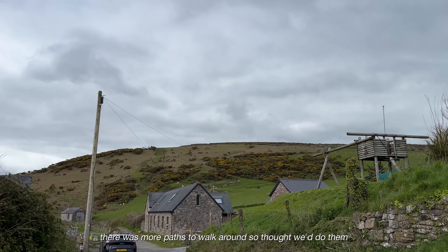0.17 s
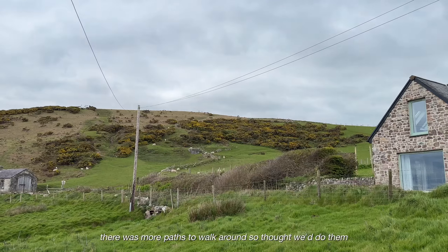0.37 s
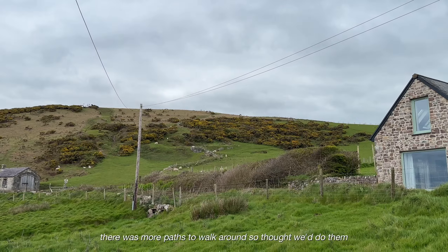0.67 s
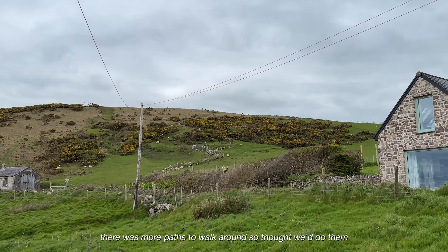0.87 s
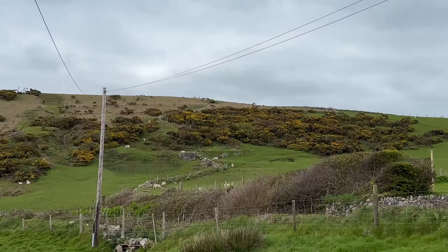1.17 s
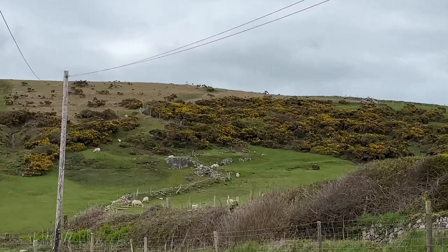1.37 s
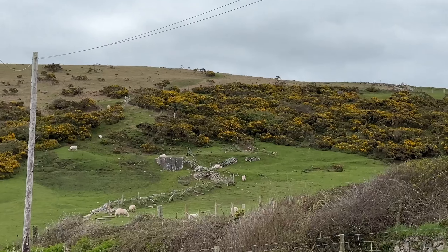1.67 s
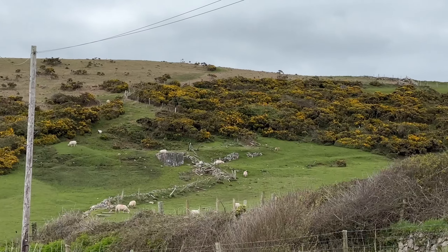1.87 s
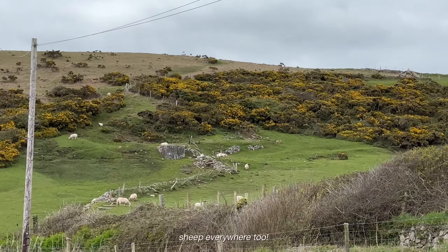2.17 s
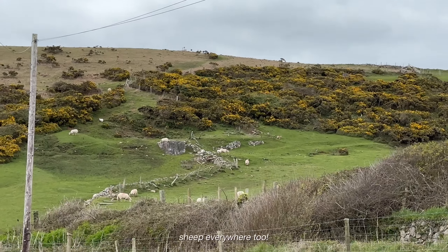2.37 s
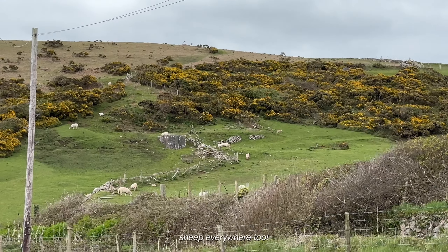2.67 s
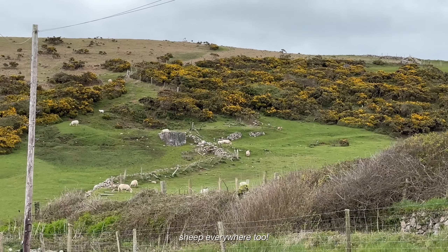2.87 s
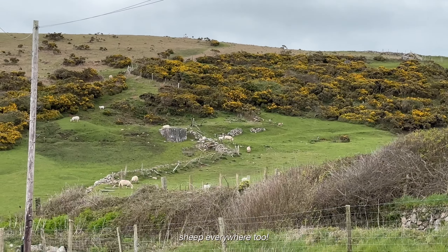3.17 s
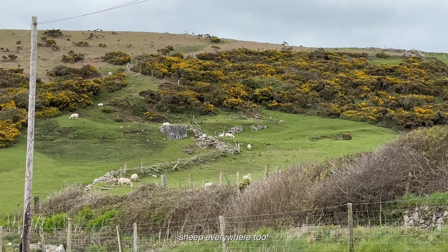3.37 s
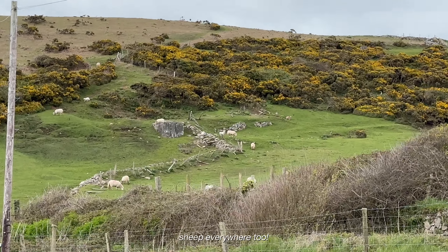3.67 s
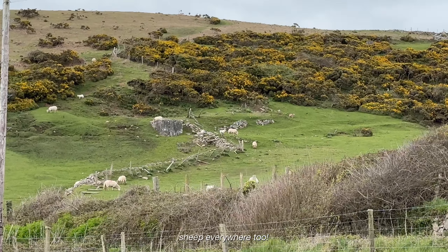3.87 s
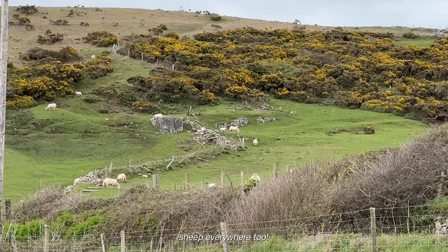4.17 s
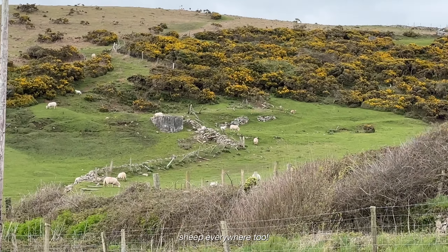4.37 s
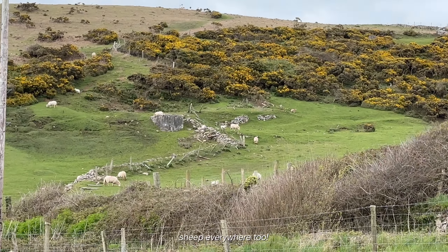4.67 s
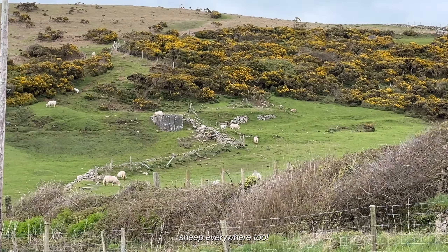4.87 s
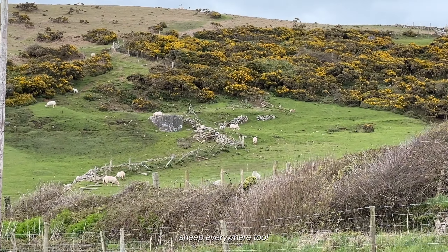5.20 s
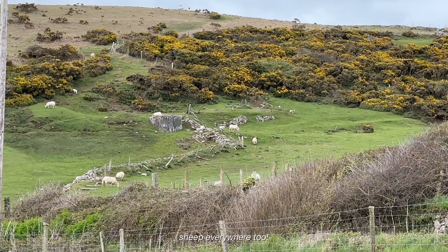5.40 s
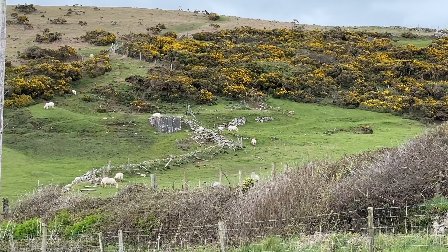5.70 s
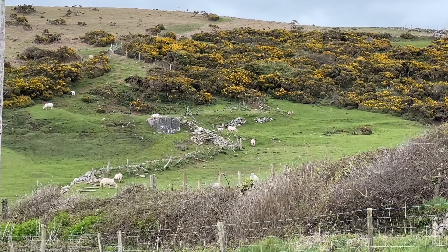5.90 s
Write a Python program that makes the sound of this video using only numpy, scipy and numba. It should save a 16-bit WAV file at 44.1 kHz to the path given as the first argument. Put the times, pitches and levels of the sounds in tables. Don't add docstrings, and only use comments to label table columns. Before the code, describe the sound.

At 0.1-0.3 s a foot drags over gritty ground with small ticks under soft hiss; at about 0.32 s a tiny gap marks a cut to an open hillside. Wind immediately buffets the stereo microphone: low rumble, muffled thumps and fluttering bursts, strongest around 0.5, 1.0-1.3 and 1.8 s, the last with sharp cracks. The hiss fades away. From 0.95 to 1.9 s a distant ewe bleats, hoarse and trembling, partly buried. A faint bird trill runs at 1.9-2.4 s, then bright gliding whistles and warbles until 4.2 s, with a lower piping bird at 2-3 s. Wind thumps return near 2.7 s, then weaken with occasional low puffs. From 4.35 to 5.25 s the bird repeats falling and rising chirps, see-saw fashion, then rattles faintly to 6 s. A far lamb's stuttered, higher bleat comes at 5.3-5.95 s. Dry twig ticks and soft leafy air continue.

```python
import sys
import numpy as np
from scipy import signal
from scipy.fft import rfft, irfft, next_fast_len
from scipy.io import wavfile
from scipy.ndimage import uniform_filter1d
from numba import njit

SR = 44100
rng = np.random.default_rng(int(sys.argv[2]) if len(sys.argv) > 2 else 0)


def volts(x):
    e = np.asarray(x, float) / 20
    return 10 ** e


def waveform_to_disk(signal):
    frames = np.transpose(np.atleast_2d(signal))
    scaled = np.clip(frames, -1, 1) * 32767
    samples = np.round(scaled).astype(np.int16)
    wavfile.write(sys.argv[1], SR, samples)


N = 266319
CALM_DB = -51
CHANGE_S = 0.35


def rms_one(x):
    return x / np.sqrt(np.mean(x ** 2) + 1e-20)


def in_time(rows, outside=None):
    s, *columns = np.transpose(rows)
    return [np.interp(np.arange(N) / SR, s, c, outside, outside) for c in columns]


def at_hz(points, hz):
    return np.interp(np.log(hz), np.log(np.array(points)[:, 0]), np.array(points)[:, 1])


def fft_hz(size):
    return np.maximum(np.arange(size // 2 + 1) * SR / size, 1)


def drift(rate):
    r = np.exp(-80 * np.pi * rate / SR)
    slow = signal.lfilter([1], [1, -2 * r, r * r], rng.standard_normal(N // 40 + 2002))[2000:]
    return np.interp(np.arange(N) / 40, np.arange(len(slow)), rms_one(slow))


def band(x, low_hz, high_hz):
    return signal.sosfilt(signal.butter(2, [low_hz, min(high_hz, .45 * SR)], "band", fs=SR, output="sos"), x)


def steep(x, low_hz, high_hz):
    once = signal.butter(2, [low_hz, high_hz], "band", fs=SR, output="sos")
    return signal.sosfilt(np.tile(once, (2, 1)), x)


def pan(x, db):
    return x * volts(np.array([[.5], [-.5]]) * db)


def pair(alike):
    mid, side = rng.standard_normal((2, N))
    alike = np.clip(alike, 0, 1)
    return (np.sqrt(1 + alike) * mid + np.sqrt(1 - alike) * side * [[1], [-1]]) / np.sqrt(2)


def coloured(x, spectrum):
    size = next_fast_len(N)
    return rms_one(irfft(rfft(x, size) * volts(at_hz(spectrum, fft_hz(size))), size)[:, :N])


@njit
def resonate(x, hz, width_hz, sr):
    y, r = np.zeros(len(x)), np.exp(-np.pi * width_hz / sr)
    for i in range(2, len(x)):
        pushed = (1 - r * r) / 2 * (x[i] - x[i - 2])
        y[i] = pushed + 2 * r * np.cos(2 * np.pi * hz[i] / sr) * y[i - 1] - r * r * y[i - 2]
    return y


def twice(x, hz, width_hz):
    hz = hz + np.zeros(N)
    return rms_one(resonate(resonate(x, hz, width_hz, SR), hz, width_hz, SR))


def gust():
    # t/s, level/dB
    slow_wind = [(0, -54), (.3, -61), (.33, -44.5), (.88, -53), (1.02, -38), (1.3, -45.5), (1.58, -64),
                 (1.66, -52), (1.85, -38), (2.08, -63.5), (2.85, -56), (3.18, -73), (3.55, -66),
                 (4.2, -63.5), (4.9, -79.5), (5.3, -60), (5.66, -81.5), (6.03, -50)]
    # t/s, level/dB, fall/(dB per s)
    buffets = [(1.12, -35, 146.5), (2.302, -65.5, 149.5), (2.633, -42.5, 102.5), (3.328, -55.5, 75),
               (3.631, -52, 208), (4.287, -51, 67), (5.334, -48, 91.5), (5.775, -54.5, 140),
               (.72, -55.5, 101.5), (1.981, -49, 150), (3.201, -65.5, 96), (3.428, -48, 162),
               (3.99, -65, 58), (4.151, -61, 105), (4.601, -61.5, 127), (5.13, -64, 76), (5.902, -46.5, 88)]
    t, db = np.arange(N) / SR, in_time(slow_wind)[0]
    for s, top_db, fall_db in buffets:
        db = np.maximum(db, top_db - np.maximum(fall_db * (t - s), 1500 * (s - t)))
    return db - CALM_DB


def wind():
    # f/Hz, level/dB
    wind_colour = [(25, -26.5), (40, -4.5), (65, 2.5), (170, -2), (400, -13.5), (700, -35), (1100, -45.5),
                   (1700, -68)]
    # f/Hz, share
    shares = [(60, 0.72), (160, 1), (500, 1.254)]
    gust_db, lumps = gust(), 1.286 * np.tanh(drift(22) / 0.76)
    white = [pair(.95), pair(.95)]
    edges = 22 * 2 ** np.arange(0, 6.6, .5)
    out = 0
    for k, (low, high) in enumerate(zip(edges, edges[1:])):
        hz = np.sqrt(low * high)
        shared_lumps = (2.5 + 2.1 * max(np.log(hz / 60), 0)) * lumps
        lump_db = shared_lumps + 2.8 * np.tanh(drift(19))
        db = CALM_DB + at_hz(shares, hz) * gust_db + at_hz(wind_colour, hz) + lump_db - 2.5
        out = out + volts(db) * rms_one(steep(white[k % 2], low, high))
    return pan(out, 1.7 * np.tanh(drift(44)))


def surges():
    # t/s, peak level/dB, f/Hz
    booms = [(0.091, -39, 89), (0.316, -53, 63), (0.542, -30.5, 79.1), (0.67, -31, 98), (1.069, -40, 108),
             (1.07, -26.5, 86), (1.137, -25, 82.5), (1.401, -36, 79.4), (1.657, -33, 55.7),
             (1.782, -30, 56.4), (2.295, -48, 78), (2.423, -46.5, 64.3), (2.572, -38.5, 70.8),
             (2.661, -34.5, 114), (2.75, -29.5, 72.7), (3.04, -40, 59.6), (3.34, -39.5, 75.6),
             (3.595, -67, 64), (4.299, -32.5, 54.4), (4.608, -62.5, 55), (4.904, -50.5, 67.4),
             (5.135, -40.5, 85.4), (5.412, -47.5, 111.6), (5.417, -36.5, 101.4), (5.533, -52, 66.3),
             (5.786, -43.5, 54.2)]
    attack_s, decay_s, sag = 0.02, 0.022, 0.22
    out, t = np.zeros((2, N + SR)), np.arange(round(.25 * SR)) / SR
    swell = (1 - np.exp(-t / attack_s)) ** 2 * np.exp(-t / decay_s)
    for (s, db, hz), (turn, side) in zip(booms, rng.standard_normal((len(booms), 2))):
        falling_hz = hz * (1 + sag * np.exp(-t / 0.018))
        boom = np.sin(2 * np.pi * np.cumsum(falling_hz) / SR + 2 * turn)
        at = round(max(s - .012, 0) * SR)
        out[:, at:at + len(t)] += pan(volts(db - 5.5) * swell / swell.max() * boom, 0.52 * side)
    return out[:, :N]


def puffs():
    # t/s, peak level/dB, brightness/dB
    eddies = [(0.323, -44.5, 0), (0.368, -38, -18), (0.407, -34, -14), (0.484, -31.5, -18),
              (0.535, -22, -20), (0.615, -28, -11), (0.671, -34.5, -18), (0.738, -64, -22),
              (0.773, -59, -34), (0.905, -47, -30), (0.959, -32.5, -25), (0.995, -23.5, -24),
              (1.009, -34, -19), (1.036, -21.5, -26), (1.072, -25, -17.5), (1.098, -39, -2.5),
              (1.111, -23, -20), (1.139, -42, 7), (1.198, -24.5, -28), (1.249, -37, -22), (1.263, -28, -10),
              (1.299, -30, -19), (1.505, -53.5, -13), (1.619, -49, 8.5), (1.715, -34, -26),
              (1.755, -34.5, -36.5), (1.78, -23, 3), (1.812, -22.5, -15), (1.838, -29.5, 10),
              (1.858, -37.5, 4.5), (1.934, -53, -5), (2.002, -53, -6), (2.178, -41, -18), (2.315, -43, -30),
              (2.417, -44, -3), (2.453, -44.5, -32), (2.512, -47.5, -15), (2.563, -41, -16),
              (2.638, -38, -24), (2.671, -33.5, -38), (2.767, -38.5, -28), (2.839, -48, -2),
              (2.874, -43.5, -25), (2.915, -45.5, -27), (2.985, -57.5, -23), (3.304, -45.5, -23),
              (3.337, -50, -19), (3.385, -41.5, -18), (3.424, -60, -23), (3.44, -48, -21), (3.64, -60, -30),
              (3.998, -52, -27), (4.294, -43.5, -18), (4.434, -50, -16), (5.33, -54, -17),
              (5.412, -37, -12), (5.798, -53, -21), (5.908, -43, -29), (5.97, -43.5, -9), (6.016, -37, -17)]
    attack_s, body_s, edge_s, alike = 0.0096, 0.0064, 0.0046, .93
    out, t = np.zeros((2, N + SR)), np.arange(round(.1 * SR)) / SR
    swell = (1 - np.exp(-t / attack_s)) ** 2
    noises = rng.standard_normal((len(eddies), 2, len(t)))
    for (s, db, bright_db), (mid, side) in zip(eddies, noises):
        white = swell * (np.sqrt(1 + alike) * mid + np.sqrt(1 - alike) * side * [[1], [-1]])
        body = steep(white * np.exp(-t / body_s), 150, 552)
        edge = steep(white * np.exp(-t / edge_s), 460, 975)
        puff = body / np.abs(body).max() + volts(bright_db - 6.0) * edge / np.abs(edge).max()
        at = round((s - .004) * SR)
        out[:, at:at + len(t)] += volts(db - 6.0) * puff
    return out[:, :N]


def cracks():
    # t/s, peak level/dB, f/Hz
    snaps = [(0.336, -51, 606), (.418, -54.5, 930), (.445, -50, 610), (.479, -50.5, 1230), (.536, -40, 600),
             (.55, -48, 805), (.62, -45.5, 756), (.998, -42, 607), (1.014, -45.5, 850), (1.043, -40.5, 600),
             (1.1, -38.5, 830), (1.116, -39, 709), (1.135, -39.5, 803), (1.145, -41, 900),
             (1.202, -40, 597), (1.265, -40.5, 644), (1.622, -48.5, 692), (1.718, -42.5, 619.5),
             (1.781, -32.5, 817), (1.814, -26, 610.5), (1.821, -32.5, 749), (1.826, -31, 750),
             (1.839, -24.5, 866), (1.848, -33, 710), (1.862, -37, 718), (1.934, -52.5, 679),
             (2.005, -61.5, 696), (2.183, -70, 695)]
    cycles, sag = 1.9, 0.3
    out, t = np.zeros((2, N + SR)), np.arange(round(.03 * SR)) / SR
    for (s, db, hz), (turn, side) in zip(snaps, rng.standard_normal((len(snaps), 2))):
        life = t * hz / cycles
        falling_hz = hz * (1 - sag * np.tanh(life - 1))
        swing = np.sin(2 * np.pi * np.cumsum(falling_hz) / SR + 3 * turn)
        crack = np.e * life * np.exp(-life) * swing
        at = round((s - .001) * SR)
        out[:, at:at + len(t)] += pan(volts(db - 3.05) * crack, 1.5 * side)
    return signal.sosfilt(signal.butter(2, 350, "high", fs=SR, output="sos"), out[:, :N])


def ports(x):
    # f/Hz, angle/radians
    port_turn = [(30, 0.45), (70, 0.63), (300, 0.72), (1100, 1.05)]
    top, cut_hz = 0.2, 1390
    size = next_fast_len(N)
    turn = at_hz(port_turn, fft_hz(size))
    x = irfft(rfft(x, size) * np.exp(.5j * turn * np.array([[-1], [1]])), size)[:, :N]
    return signal.sosfilt(signal.butter(4, cut_hz, fs=SR, output="sos"), top * np.tanh(x / top))


def add(out, t, hz, db):
    ends = np.clip(np.minimum(t - t[0], t[-1] - t) / 0.0019, 0, 1)
    at = round(t[0] * SR)
    out[at:at + len(t)] += np.sqrt(2) * volts(db) * ends * np.sin(2 * np.pi * np.cumsum(hz) / SR)


def birds(notes):
    out, waver = np.zeros(N + SR), 16 * drift(120)
    for note in notes:
        s, hz, db = np.transpose(note)
        t = np.arange(s[0], s[-1], 1 / SR)
        smooth_hz = uniform_filter1d(np.interp(t, s, hz), size=200)
        add(out, t, smooth_hz + waver[round(s[0] * SR):][:len(t)], np.interp(t, s, db))
    return out[:N]


def glides(rows):
    edge_s, edge_db = 0.0086, 23
    notes = []
    for s, length, a_hz, b_hz, db in rows:
        edge = min(edge_s, length / 3)
        step_hz = (b_hz - a_hz) * edge / length
        notes.append([(s, a_hz, db - edge_db), (s + edge, a_hz + step_hz, db),
                      (s + length - edge, b_hz - step_hz, db), (s + length, b_hz, db - edge_db)])
    return notes


def repeats(shape, sung):
    return [np.array(shape) * [1, 1 + 0.015 * rng.standard_normal(), 1] + [s, 0, db] for s, db in sung]


def trills_and_rattle():
    quick_runs = [
        (1.918, .0572, 8, .019, 4060, 3940),
        (1.960, .0572, 8, .007, 4600, 5200),
        (5.427, .0331, 16, .009, 6800, 3900),
        (3.078, .03, 2, .006, 5500, 4300),
    ]
    run_levels = [(-101, -75), (-106, -82), (-83, -91), (-88, -84)]
    sag_hz_per_s, rasp_db = 2200, 8
    out = np.zeros(N)
    for (first, period, count, length, from_hz, to_hz), (first_db, last_db) in zip(quick_runs, run_levels):
        t = np.arange(0, length, 1 / SR)
        for k, db in enumerate(np.linspace(first_db, last_db, round(count))):
            start = first + k * period + .001 * rng.standard_normal()
            sag_hz = (period < .04) * sag_hz_per_s * k * period
            hz = to_hz + (from_hz - to_hz - sag_hz) * (1 - t / length) ** 2
            rasp = rasp_db * (length < .012) * np.sin(2 * np.pi * 280 * t + k ** 2)
            add(out, start + t, hz, db + 2 * rng.standard_normal() + rasp)
    return out


def warble():
    # t/s, length/s, centre f/Hz, swing/Hz, level/dB
    warbled = [(2.446, 0.175, 6650, 172, -85)]
    swings_per_s, top_s, dip_db_per_khz, climb_hz_per_s, swell_db_per_s = 27, 0.011, 17, 1100, 48
    out = np.zeros(N)
    for s, length, hz, swing_hz, db in warbled:
        t = np.arange(0, length, 1 / SR)
        swing = swing_hz * np.cos(2 * np.pi * swings_per_s * (t - top_s))
        swing_db = swell_db_per_s * (t - length) - dip_db_per_khz * swing / 1000
        add(out, s + t, hz + swing + climb_hz_per_s * t, db + swing_db)
    return out


def songbird():
    # t/s, length/s, from f/Hz, to f/Hz, level/dB
    whistles = [(2.37, .028, 4330, 3800, -77), (2.535, .077, 5050, 5200, -94),
                (2.665, .053, 3640, 3900, -80), (2.715, .045, 3880, 3780, -93),
                (2.76, .052, 3680, 3900, -88), (2.815, .1, 3850, 3800, -94), (2.593, .016, 7250, 7100, -85),
                (3.055, .01, 4100, 3700, -83), (2.995, .02, 3200, 2500, -90),
                (3.005, .046, 3560, 4030, -74.5), (2.843, .017, 4670, 6360, -82),
                (2.9, .09, 4800, 4780, -94), (3.2, .03, 5550, 5450, -74), (3.95, .13, 4060, 3835, -77.5),
                (4.075, .076, 3960, 3840, -83), (4.115, .031, 7370, 6630, -74.5),
                (4.145, .16, 6890, 6640, -74)]
    # t/s, f/Hz, level/dB
    bent = [
        [(2.429, 4660, -88), (2.44, 5174, -70.5), (2.47, 5240, -68.5), (2.52, 5090, -68.5), (2.534, 5150, -89)],
        [(3.142, 4980, -86), (3.151, 6480, -76), (3.165, 6540, -78.5), (3.178, 5800, -76), (3.189, 5420, -59.5),
         (3.203, 6220, -76)],
        [(3.245, 5960, -76), (3.258, 5020, -68), (3.285, 4690, -60.5), (3.305, 4150, -75), (3.322, 3720, -85)],
        [(2.856, 6280, -70), (2.866, 6800, -91), (2.878, 6200, -73), (2.893, 6150, -75), (2.905, 6680, -75),
         (2.915, 6500, -81), (2.925, 6120, -81), (2.945, 5970, -81), (2.956, 5700, -91)],
        [(3.807, 6160, -79), (3.82, 5090, -65), (3.84, 4970, -67.5), (3.865, 4700, -67.5), (3.875, 4400, -78.5),
         (3.892, 3800, -80)],
        [(5.297, 4660, -79), (5.308, 5710, -64), (5.33, 6060, -75.5), (5.345, 6570, -75.5), (5.39, 6220, -77.5),
         (5.404, 5840, -73)],
        [(5.955, 6130, -89.5), (5.966, 6830, -87), (5.99, 6900, -84), (6.016, 6330, -85)],
        [(1.795, 5710, -104), (1.81, 5920, -88), (1.83, 6000, -99)],
        [(3.335, 2860, -85), (3.352, 1970, -89), (3.36, 2190, -83), (3.366, 3760, -89.5)],
    ]
    # time after the start/s, f/Hz, level/dB
    arch = [(0, 4280, -1.5), (.007, 6700, -0.5), (.02, 7760, -26), (.05, 7520, -11), (.09, 7330, -11),
            (.115, 7000, -2.5), (.128, 6870, -19)]
    stepped = [(0, 6000, -9), (.014, 5010, -4), (.04, 4930, 1.5), (.046, 4970, -18), (.054, 4700, -3),
               (.07, 4260, -2.5), (.084, 3770, -15)]
    rise = [(0, 3950, -21), (.01, 4880, -5.5), (.033, 5120, -3.5), (.046, 5500, -9), (.054, 5530, 1)]
    fall = [(0, 5810, -14), (.005, 5690, -3.5), (.013, 5110, 1.5), (.024, 4270, -1), (.038, 3980, -9.5),
            (.05, 3920, -6.5)]
    # t/s, level/dB
    arches_at = [(3.365, -77.5), (3.649, -78.5)]
    steps_at = [(3.529, -67.5)]
    rises_at = [(4.437, -60.5), (4.608, -61), (4.779, -65.5), (4.951, -66), (5.126, -69.5)]
    falls_at = [(4.359, -68), (4.518, -67), (4.686, -68.5), (4.858, -75), (5.028, -71), (5.202, -71)]
    see_saw = repeats(rise, rises_at) + repeats(fall, falls_at)
    repeated = repeats(arch, arches_at) + repeats(stepped, steps_at) + see_saw
    song = birds(glides(whistles) + bent + repeated) + trills_and_rattle() + warble()
    return song * volts(2.2 * drift(110))


def piper():
    # t/s, length/s, from f/Hz, to f/Hz, level/dB
    piped = [(2.03, 0.054, 2296, 2170, -86.5), (2.235, 0.067, 2460, 2100, -84),
             (2.33, 0.093, 2460, 2040, -89), (2.41, 0.097, 2030, 2110, -90),
             (2.52, 0.15, 2080, 1940, -88.5), (2.632, 0.11, 2280, 2280, -86),
             (2.725, 0.16, 2236, 2243, -81.5), (2.835, 0.04, 2400, 2950, -90),
             (2.875, 0.077, 2760, 2450, -81), (2.93, .1, 2490, 2240, -81.5), (3.03, 0.079, 2300, 2720, -91),
             (4.1, 0.086, 2390, 2670, -100), (4.17, 0.072, 2750, 2540, -97),
             (2.075, 0.067, 3600, 3000, -101)]
    return birds(glides(piped))


def pulses(per_s, jitter, shimmer_db, breath):
    phase = np.cumsum(per_s * (1 + jitter * drift(68))) / SR
    clicks = np.diff(np.floor(phase), prepend=0) * volts(shimmer_db * rng.standard_normal(N))
    return rms_one(clicks) + breath * rng.standard_normal(N) * (1 - phase % 1) ** 2


def ewe():
    # t/s, pulses per s, level/dB, third throat resonance f/Hz
    bleat = [(.95, 161, -86.5, 2065), (1.0, 143, -81, 2090), (1.15, 142, -76.5, 2114),
             (1.33, 136, -76.5, 2174), (1.41, 163, -79, 2215), (1.55, 161, -76, 2250),
             (1.67, 150, -80, 2350), (1.8, 129, -83, 2410), (1.92, 128, -88.5, 2640)]
    # f/Hz, level/dB, polarity, width/Hz
    throat = [(690, 14, 1, 240), (1470, 2.5, -1, 300), (2580, -6.5, -1, 280), (3250, -16, 1, 300)]
    per_s, third_hz = in_time(bleat)[::2]
    tremble = np.sin(2 * np.pi * np.cumsum(26 + 4 * drift(5)) / SR)
    source = pulses(per_s * (1 + .04 * tremble), jitter=.028, shimmer_db=3., breath=.45)
    voice = twice(source, third_hz * (1 + .012 * drift(12)), 260.)
    opening = third_hz / 2250 - 1
    for hz, db, polarity, width_hz in throat:
        db = db + (hz > 2400) * 13 * 2.25 * opening
        moving_hz = hz * (1 + .3 * opening + 0.018 * tremble + 0.015 * drift(4.7))
        voice = voice + polarity * volts(db) * twice(source, moving_hz, float(width_hz))
    level_db = in_time(bleat, -140)[1] + 2.0 * tremble + 0.83 * drift(14) + 1.9 * np.tanh(drift(35))
    return volts(level_db) * steep(voice, 400, 6400)


def lamb():
    # t/s, peak level/dB, upper resonance level/dB, upper resonance f/Hz
    bursts = [(5.272, -74, -7, 3300), (5.328, -84, 8, 3700), (5.402, -79, 6, 3750),
              (5.461, -66.5, -14, 3750), (5.532, -66, -17, 3800), (5.597, -66, -18, 3800),
              (5.671, -74, -12, 3900), (5.739, -75.5, -9, 4000), (5.81, -81, -3, 4000),
              (5.878, -83, 2, 4000), (5.948, -88, 1, 4050)]
    # t/s, f/Hz
    pitch = [(5.27, 292), (5.46, 311.6), (5.63, 312.2), (5.77, 309.2), (6.0, 296)]
    burst_s, catch_s, catch_db, chest_db = .037, .048, -8, -83
    t, out = np.arange(N) / SR, np.zeros(N)
    pitch_hz = in_time(pitch)[0]
    rougher = .003 + .011 * np.clip(t - 5.64, 0, 1) / .3
    source = pulses(pitch_hz, jitter=rougher, shimmer_db=2., breath=.8)
    low = twice(source, 940, 200.)
    mid = twice(source, 9 * pitch_hz, 260.)
    top = twice(source, in_time(bursts)[2], 620.)
    for s, db, top_db, _ in bursts:
        gate = np.clip(np.minimum((t - s + .006) / .008, (s + burst_s + .004 - t) / .012), 0, 1)
        gate = gate + volts(catch_db) * np.clip(1 - np.abs(t - s - catch_s) / 0.013, 0, 1)
        out += gate * (volts(db - 5.5) * (mid - volts(top_db) * top) + volts(chest_db) * low)
    return out * volts(0.74 * drift(40))


def hillside(x, side_db, wet_db, t60):
    t = np.arange(round(.5 * SR)) / SR
    decay = volts(-60 * t / t60) + volts(-20 - 60 * t / 0.77)
    clumps = volts(4.4 * np.array([drift(40)[:len(t)], drift(40)[:len(t)]]))
    echoes = rng.standard_normal((2, len(t))) * decay * (t > .006) * clumps
    echoes = echoes / np.sqrt(np.sum(echoes ** 2, axis=1, keepdims=True))
    return pan(x, side_db) + volts(wet_db) * signal.fftconvolve(x[None], echoes, axes=1)[:, :N]


def scuff():
    # f/Hz, level/dB
    scuff_colour = [(300, -17), (700, -6.5), (1350, 5.5), (2200, -2.5), (3000, -12), (7000, -21),
                    (10000, -34), (15000, -32.5)]
    # t/s, level/dB, attack/s, decay/(dB per s)
    contacts = [
        (0.164, -50, 0.016, 900),
        (0.181, -53, 0.0027, 1494),
        (.2, -60.5, 0.008, 500),
        (0.253, -62, 0.0067, 900),
        (0.187, -47.5, 0.0023, 1500),
        (.2, -77, 0.06, 93),
        (.3, -72.5, 0.14, 1500),
    ]
    t, touch = np.arange(N) / SR, 0
    for s, db, attack, fall_db in contacts:
        press = np.clip(1 + (t - s) / attack, 0, 1) ** 2
        touch = touch + volts(db - np.maximum(fall_db * (t - s), 0)) * press
    grit = pair(.4) * volts(3 * drift(150))
    return pan(touch * coloured(grit, scuff_colour), -.5)


def ticks():
    # t/s, peak level/dB, low part/dB
    snaps = [(.102, -76, -11), (.162, -72, 11), (.125, -72, -6), (.293, -68, 0), (.319, -63, 15),
             (0.181, -64.5, 23.5), (0.19, -64.5, 22), (0.3365, -44, 1.5), (0.383, -56, -1),
             (0.477, -71, 11), (0.828, -53, -13), (0.929, -69, 11.5), (2.18, -65, -6), (2.282, -73, 11.5),
             (2.8235, -58, 9.5), (2.878, -72, 12), (3.835, -71.5, 14.5), (3.877, -65.5, -3),
             (4.356, -78, 14.5), (4.5717, -48.5, 7), (4.657, -76, -5), (4.7, -91, -7), (5.743, -65, -12),
             (5.929, -66, -14), (6.0378, -55.5, 6.5), (.69, -60.5, -14), (3.165, -64, -18), (3.62, -73, -3),
             (3.777, -86.5, 21), (4.439, -75, 13), (2.097, -71, -9)]
    out, t = np.zeros((2, N + 400)), np.arange(400) / SR
    for (s, db, low_db), noise in zip(snaps, rng.standard_normal((len(snaps), 400))):
        burst = 0.28 * noise + 4.3 * (t == 0)
        high = band(burst * np.exp(-t / .0003), 3500, 9000)
        low = band(burst * np.exp(-t / .0008), 1100, 3700)
        tick = high / np.abs(high).max() + volts(low_db) * low / np.abs(low).max()
        at = round(s * SR)
        out[:, at:at + 400] += pan(volts(db - 4.5) * tick, -1.5)
    return out[:, :N]


def fading_hiss():
    # f/Hz, level/dB per Hz
    hiss_colour = [(900, 1.5), (1500, 5.5), (3200, -5), (6800, -6.5), (9000, -13.5), (12000, -14),
                   (14500, -17.5), (15500, -50)]
    t = np.arange(N) / SR
    after = t > CHANGE_S
    fade_db = after * (-0.5 + 16 * (t - CHANGE_S)) + 70 * np.maximum(t - 1.1, 0)
    before_db = 3.4 * (t > .1) * (t < CHANGE_S)
    hiss = volts(-73 - fade_db + before_db + 1.5 * drift(30)) * coloured(pair(0.15), hiss_colour)
    top = band(hiss, 9500, 16000)
    top_db = -8 * np.maximum(t - CHANGE_S, 0) - 2.8 * after + 4.5 * drift(4.1)
    return hiss - top * (1 - volts(top_db))


def far_air():
    # f/Hz, level/dB per Hz
    air_colour = [(180, -15.5), (400, 1), (800, -2.5), (2300, -16), (3300, -29), (4500, -25.5),
                  (7300, -28.5), (7900, -60)]
    return volts(-77 + 0.53 * drift(6.5)) * coloured(pair(0.54), air_colour)


def capsule_hiss():
    # f/Hz, level/dB per Hz
    capsule_colour = [(7900, -24.5), (9800, 2.5), (12000, -14.5), (15500, -12)]
    return volts(-102 + 0.28 * gust() + 2.6 * drift(9)) * coloured(pair(0.34), capsule_colour)


def shadowed(x):
    # f/Hz, left minus right/dB
    body_shadow = [(300, 0), (500, 1), (830, 4), (1400, 2), (2300, -0.5), (3500, 1)]
    size = next_fast_len(N)
    return irfft(pan(rfft(x, size), at_hz(body_shadow, fft_hz(size))), size)[:, :N]


def scene():
    blown = ports(wind() + puffs() + surges() + cracks())
    animals = hillside(songbird(), 0.38, -10, 0.3) + hillside(piper(), -1.5, -5, .4)
    animals = animals + hillside(ewe(), 0, -11, .3) + hillside(lamb(), 0, -6, .3)
    background = far_air() + capsule_hiss() + fading_hiss()
    from_hole = np.abs(np.arange(N) / SR - .3155)
    hole = volts(-11 * np.clip(2 - from_hole / 0.0039 * 2, 0, 1))
    return hole * shadowed(blown + background + scuff() + ticks() + animals)


def low_pass(x):
    return signal.sosfilt(signal.butter(12, 14850, fs=SR, output="sos"), x)


def record(dry):
    return low_pass(dry)


dry = scene()
out = record(dry)
waveform_to_disk(out)
```